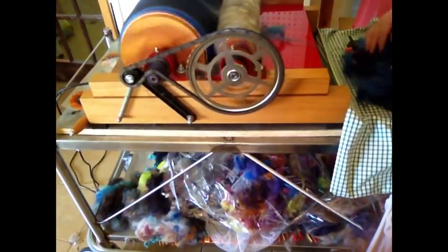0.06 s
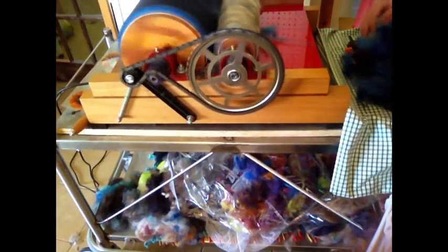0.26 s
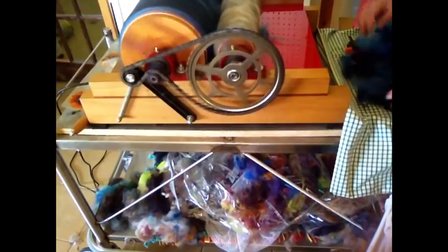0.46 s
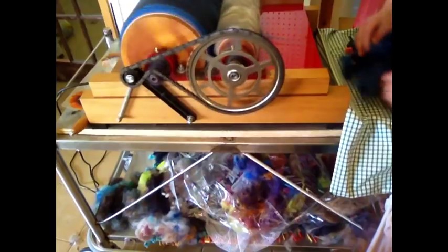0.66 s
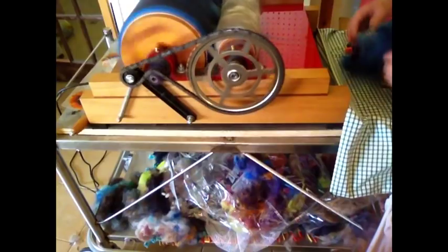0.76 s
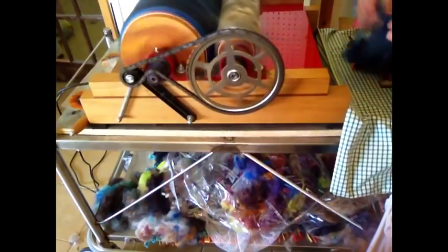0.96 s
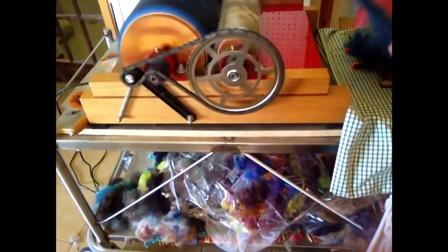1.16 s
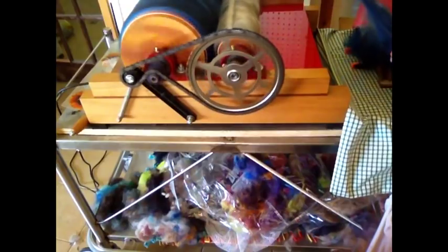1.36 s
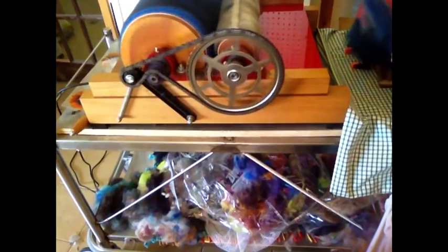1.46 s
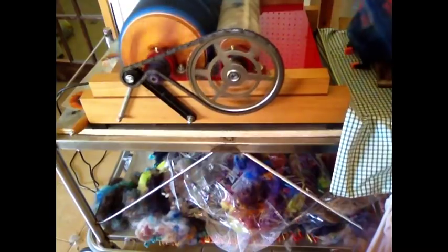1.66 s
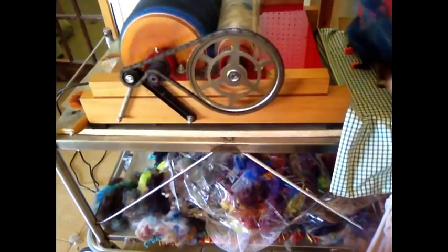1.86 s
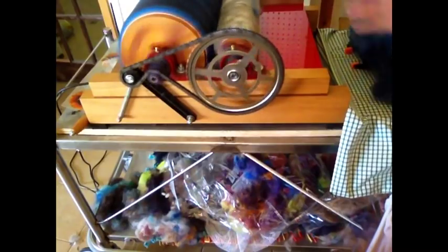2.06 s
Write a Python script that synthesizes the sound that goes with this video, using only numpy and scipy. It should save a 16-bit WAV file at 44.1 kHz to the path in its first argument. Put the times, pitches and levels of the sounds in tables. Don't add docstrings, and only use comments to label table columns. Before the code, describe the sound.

An electric drum carder hums and buzzes close by in a small room, wire teeth rasping wool; the rasp swells into a rattling wooden thump at half a second, then eases, with small knocks and chain ticks.

```python
import sys
import numpy as np
from scipy import signal
from scipy.fft import rfft, irfft
from scipy.io import wavfile

SR = 44100
rng = np.random.default_rng(int(sys.argv[2]) if len(sys.argv) > 2 else 0)


def wrap_up_sound(samples):
    columns = np.atleast_2d(samples).T
    tamed = np.clip(columns, -1, 1)
    steps = np.round(tamed * 32767).astype(np.int16)
    wavfile.write(sys.argv[1], SR, steps)


def linear_from_db(decibels):
    return 10 ** (np.asarray(decibels, float) / 20)


N = 92610


def evened(x):
    return x / np.sqrt(np.mean(x ** 2) + 1e-20)


def slow(rate_hz):
    b, a = signal.butter(2, rate_hz, fs=SR)
    return evened(signal.lfilter(b, a, rng.standard_normal(N + SR))[SR:])


def hit_time():
    return np.arange(SR // 4) / SR


def shaped(x, points):
    hz = np.fft.rfftfreq(len(x), 1 / SR) + 1
    f, db = np.transpose(points)
    octaves_out = np.maximum(np.log2(f[0] / hz), 0) + np.maximum(np.log2(hz / f[-1]), 0)
    colour_db = np.interp(np.log(hz), np.log(f), db) - 18 * octaves_out
    return evened(irfft(rfft(x) * linear_from_db(colour_db), len(x)))


def resonate(x, hz, width):
    turn = np.exp(2j * np.pi * np.cumsum(hz * np.ones(len(x))) / SR)
    r = np.exp(-np.pi * width / SR)
    return 2 * (turn * signal.lfilter([1 - r], [1, -r], x / turn)).real


def ring(modes, spread):
    t = hit_time()
    x = np.zeros(len(t))
    for hz, db, t60 in modes:
        detune, change = rng.uniform(-0.86, 1, 2)
        x += linear_from_db(db + 2 * change - 60 * t / t60) * np.sin(2 * np.pi * hz * (1 + spread * detune) * t)
    return x / abs(x).max()


def add(mix, s, sound):
    part = mix[max(round(s * SR), 0):][:len(sound)]
    part += sound[:len(part)]


def highpass(x, order, hz):
    return signal.sosfilt(signal.butter(order, hz, "high", fs=SR, output="sos"), x)


def buzz(hz, width):
    path_hz = hz + 0.15 * width * slow(3.1)
    tone = np.sqrt(2) * np.sin(2 * np.pi * (np.cumsum(path_hz) / SR + rng.random()))
    fuzz = evened(resonate(resonate(rng.standard_normal(N), hz, width), hz, width))
    share = 0.65 * (width < 20)
    return share * tone + (1 - share) * fuzz


# multiple of 120 Hz, level in dB rms.
HUM_TONES = [(1, -73.5), (2, -50.5), (3, -90), (4, -68.5), (5, -52), (6, -85.5)]
# pitch in Hz, width in Hz, level in dB.
BUZZ_LINES = [(139.7, 1.5, -68), (172.2, 8.6, -64.5), (202, 21, -62.5), (269.4, 9.7, -55),
              (311.6, 8.2, -56.5), (352.8, 10.4, -51), (389, 14.2, -53.5), (420, 56, -64), (621, 49, -59)]
# frequency in Hz, level in dB per Hz.
FLOOR_COLOUR = [(60, -33.5), (105, -27), (140, -11.5), (240, -1.5), (700, -13.5), (1900, -18.5),
                (3500, -27.5), (15000, -33)]


def motor(load_db):
    t = np.arange(N) / SR
    strain = 1 / (1 + np.exp((t - 1.117) / 0.016))
    hum = np.zeros(N)
    for k, db in HUM_TONES:
        strain_db = (-8 + 5 * slow(8.4)) * (k > 2) * strain
        level = np.sqrt(2) * linear_from_db(db + 0.7 * slow(3.1) + strain_db)
        hum += level * np.sin(2 * np.pi * (k * 120 * t + rng.random()))
    frame = sum(linear_from_db(db) * buzz(hz, width) for hz, width, db in BUZZ_LINES)
    floor = linear_from_db(-51.5 + 1.1 * slow(2.3)) * shaped(rng.standard_normal(N), FLOOR_COLOUR)
    return hum + frame * linear_from_db(0.084 * load_db - 4 * strain) + floor


def gritty(per_s, spread_db, share):
    size = linear_from_db(spread_db * np.minimum(rng.exponential(1, N), 5))
    contacts = size * (rng.random(N) < per_s / SR) * rng.choice([-1, 1], N)
    return share * evened(contacts) + (1 - share) * rng.standard_normal(N)


# frequency in Hz, level in dB per Hz.
RASP_COLOUR = [(200, -11), (400, 2.5), (800, -8.5), (1150, -6), (1800, -4), (2400, -10), (3000, -18),
               (5000, -22.5)]
# frequency in Hz, level in dB per Hz.
HISS_COLOUR = [(2500, -2), (4500, -5.5), (8000, -7), (11500, -9), (14000, -17.5), (15300, -24)]
# pitch in Hz, width in Hz, level in dB.
DRUM_MODES = [(880, 10, -42), (958, 17, -0.5), (1042.5, 14, -3.5), (1198, 80, 0.5), (1385, 18, -4),
              (1560, 40, -2), (1805, 46, -3), (2275, 66, -6.5), (2720, 44, -18)]


def carding(level_db, hiss_db, centre_hz):
    teeth = shaped(gritty(2500, 2.43, 0.43), RASP_COLOUR)
    wander = evened(resonate(teeth, centre_hz, 220))
    drum = evened(sum(linear_from_db(db) * resonate(teeth, hz, w) / np.sqrt(w) for hz, w, db in DRUM_MODES))
    rasp = evened(teeth + linear_from_db(-12.5) * wander + linear_from_db(-3) * drum)
    hiss = shaped(gritty(2800, 2.6, 0.38), HISS_COLOUR)
    rasp_level = linear_from_db(level_db + 0.9 * slow(31))
    hiss_level = linear_from_db(level_db + hiss_db + 0.5 + 1.4 * slow(26))
    return rasp_level * rasp + hiss_level * hiss


# start in seconds, peak level in dB.
PIN_SNAPS = [(0.0572, -38), (0.111, -43), (0.5486, -36.5), (0.5784, -29.5), (0.598, -39), (0.9631, -38),
             (1.3859, -34.5), (1.4083, -49), (1.7803, -60), (1.8555, -48.5), (1.9884, -55)]
# pitch in Hz, width in Hz, level in dB.
PIN_BANDS = [(12500, 1100, -6), (11200, 3500, -10), (8400, 2600, -11.5), (6700, 1400, -12),
             (4250, 1800, -11)]
# pitch in Hz, level in dB, 60 dB decay in seconds.
PIN_RING = [(12270, 5, 0.044), (11200, -9, 0.022), (8600, -16, .008)]


def snaps():
    out, t = np.zeros(N), hit_time()
    for s, db in PIN_SNAPS:
        crack_and_fizz = linear_from_db(-60 * t / 0.03) + linear_from_db(8 - 60 * t / 0.17)
        z = rng.standard_normal(len(t)) * crack_and_fizz
        steel = np.zeros(len(t))
        for k, (hz, width, band_db) in enumerate(PIN_BANDS):
            band = resonate(resonate(z, hz, width), hz, width) / np.sqrt(width)
            steel += (-1) ** k * linear_from_db(band_db) * band
        add(out, s, linear_from_db(db) * (steel / abs(steel).max() + linear_from_db(-5) * ring(PIN_RING, 0.0076)))
    return out


# start in seconds, level in dB, pitch in Hz, length in seconds.
WOOL_SCUFFS = [(0.059, -46.5, 1280, 0.017), (0.393, -42, 900, 0.019), (.4, -44.5, 1500, 0.018),
               (0.421, -39, 1210, 0.033), (0.456, -37.5, 1240, 0.025), (0.453, -40, 1530, 0.01),
               (0.477, -41, 1050, 0.025), (0.5, -37, 1230, 0.013), (0.525, -37.5, 1420, 0.011),
               (0.751, -46, 1420, 0.022), (0.766, -40.5, 1540, 0.011), (0.779, -37.5, 1550, 0.023),
               (0.849, -46, 1600, 0.022), (0.958, -43, 1520, 0.04), (0.993, -45.5, 1500, 0.04),
               (1.042, -47.5, 1440, 0.027), (1.39, -47, 1820, 0.013), (1.63, -47, 1340, 0.01),
               (1.7, -44.5, 1520, 0.014), (1.855, -44, 1220, 0.012)]


def scuffs():
    out, t = np.zeros(N), hit_time()
    for s, db, hz, length in WOOL_SCUFFS:
        z = rng.standard_normal(len(t))
        drag = evened(resonate(z, hz, 140)) + linear_from_db(-5) * shaped(z, RASP_COLOUR[2:])
        swell = np.minimum(t / length * 3, 1) * np.exp(-(t / length) ** 2)
        add(out, s, linear_from_db(db + 0.5) * drag * swell)
    return out


def knock(hz):
    head_s = 0.00065
    u = hit_time() - 2 * head_s
    head = -np.cos(2 * np.pi * hz * 0.95 * u + 0.6) * np.exp(-(u / head_s) ** 2)
    board = ring([(hz, 0, 0.05), (hz * 5 / 8, -3, 0.02), (hz * 3 / 8, -6, 0.04)], 0.01)
    return head + linear_from_db(-5) * np.clip(u / 0.0006, 0, 1) * board


# start in seconds, peak level in dB, pitch in Hz.
BOARD_KNOCKS = [(.118, -31, 960), (.309, -36, 926), (.694, -35, 961), (1.105, -37, 1180), (1.157, -39, 969),
                (1.2337, -28, 966), (1.2835, -33, 1300), (1.2875, -30, 1500), (1.2935, -35, 1750),
                (1.489, -36, 1200), (1.526, -36, 915), (1.632, -40, 1150), (1.683, -37, 1080),
                (1.76, -28, 964), (1.7645, -39, 1550), (1.778, -37, 1250), (1.789, -37, 1200),
                (1.837, -38, 1370), (1.909, -38, 1260), (1.9973, -31, 1080), (2.0045, -36, 1200),
                (2.048, -39, 1790)]


def knocks():
    out = np.zeros(N)
    for s, db, hz in BOARD_KNOCKS:
        add(out, s, linear_from_db(db) * knock(hz))
    return out


# start in seconds, level in dB.
FRAME_BLOWS = [
    (0.548, -29),
    (0.554, -28),
    (0.5575, -23.5),
    (.58, -30),
    (0.604, -28.5),
    (.612, -30.5),
]
# pitch in Hz, level in dB, 60 dB decay in seconds.
BOARD_MODES = [(606.5, -3, 0.13), (900, 2, 0.055), (1153, -8, 0.084), (1790, 0, 0.027), (2840, -6, 0.03),
               (4230, -14, .02), (6340, -7.5, 0.019)]


def blows():
    out, t = np.zeros(N), hit_time()
    for s, db in FRAME_BLOWS:
        puff = linear_from_db(-8 - 60 * t / 0.072) * shaped(rng.standard_normal(len(t)), RASP_COLOUR)
        add(out, s, linear_from_db(db) * (ring(BOARD_MODES, 0.028) * np.minimum(t / 0.0002, 1) + puff))
    return out


# start in seconds, level in dB, start pitch in Hz, sag in Hz,
# 60 dB decay in seconds.
FRAME_BOOMS = [
    (0.5495, -18, 376, 10, 0.04),
    (.567, -25.5, 375, 130, .17),
    (.596, -31, 356, 8, .22),
    (.651, -35, 385, 10, .12),
]
# pitch in Hz, level in dB, 60 dB decay in seconds.
FRAME_MODES = [(142, 1, 0.79), (216, 3, 0.85), (256.3, 2, 0.73), (330, -8, 0.36), (350, -6, 0.5),
               (379, -3, 0.32)]


def thump():
    out, t = np.zeros(N), hit_time()
    rise_s, sag_s = 0.008, 0.027
    rise = np.minimum(t / rise_s, 1)
    for s, db, top_hz, sag_hz, t60 in FRAME_BOOMS:
        hz = top_hz - sag_hz * (1 - np.exp(-(t / sag_s) ** 2))
        decay = linear_from_db(-60 * np.maximum(t - rise_s, 0) / t60)
        boom = np.sin(2 * np.pi * np.cumsum(hz) / SR) * decay
        add(out, s, linear_from_db(db) * rise * (boom + linear_from_db(-16.5) * ring(FRAME_MODES, 0.0036)))
    return out


# start in
# seconds, peak level in dB.
LINK_TICKS = [(.611, -36.5), (1.058, -67), (1.106, -43), (1.1575, -43.5), (1.2094, -43), (1.2616, -47),
              (1.315, -46), (1.4363, -54), (1.4727, -65), (1.526, -57), (1.577, -51), (1.6303, -66),
              (1.6821, -47), (1.736, -44), (1.8029, -45), (1.8406, -52), (1.8936, -49), (1.9426, -49),
              (2.0468, -51)]
# pitch in Hz, level in dB, 60 dB decay in seconds.
LINK_MODES = [(3534, 18, 0.039), (3860, 10, 0.017), (2840, -3, 0.01), (2300, 2, .012), (1500, 3, 0.011),
              (4600, 0, .008)]


def chain():
    out, t = np.zeros(N), hit_time()
    grit_colour = [(900, -2), (2400, 0), (4200, -15), (8000, -29)]  # Hz, dB per Hz
    for s, db in LINK_TICKS:
        grit = linear_from_db(-4.5 - 60 * t / 0.11) * shaped(rng.standard_normal(len(t)), grit_colour)
        add(out, s - 0.0007, linear_from_db(db + 1.5) * (ring(LINK_MODES, 0.043) + grit))
        add(out, s + 0.02, linear_from_db(db - 8) * ring(LINK_MODES, 0.054))
    return out


def room(x, t60):
    t = np.arange(SR // 3) / SR
    sparse = rng.choice([-1., 1.], len(t)) * (rng.random(len(t)) < 2000 / SR)
    taps = sparse * linear_from_db(-60 * t / t60) * (t > 0.004)
    dull = signal.lfilter([0.4], [1, -0.6], taps / np.linalg.norm(taps))
    return signal.fftconvolve(x, dull)[:N]


# time in seconds, rasp level in dB, hiss relative to it in dB, rasp centre in Hz.
EFFORT = [(0.0, -44.5, -17.5, 1410), (0.2, -41, -11.5, 1240), (0.36, -50, -14.5, 1300),
          (0.47, -36, -14, 1420), (0.54, -39.5, -11, 1370), (0.549, -36, -13, 1540),
          (0.68, -45, -11.5, 1320), (0.74, -48.5, -11.5, 1500), (0.78, -42, -10, 1520),
          (0.83, -42, -12.5, 1430), (1.05, -45.5, -15.5, 1510), (1.2, -51.5, -6.5, 1380),
          (1.28, -46, -19, 1430), (1.43, -46.5, -16.5, 1430), (1.6, -47.5, -12.5, 1500),
          (1.72, -48.5, -15.5, 1380), (1.79, -47.5, -12, 1310), (2.1, -56, -20, 1200)]


def scene():
    t = np.arange(N) / SR
    s, *columns = np.transpose(EFFORT)
    level_db, hiss_db, centre_hz = (np.interp(t, s, c) for c in columns)
    machine = motor(level_db + 63) + carding(level_db, hiss_db, centre_hz)
    hits = highpass(snaps() + blows() + chain(), 4, 110)
    taps = highpass(scuffs() + knocks(), 2, 200)
    tail = room(linear_from_db(-4.5) * hits + linear_from_db(-9.5) * taps, 0.32)
    return (machine + hits + taps + thump() + tail)[None]


def low_pass(x):
    return signal.sosfilt(signal.butter(12, 16040, fs=SR, output="sos"), x)


def record(dry):
    edge = signal.firwin(401, 15450, window=("kaiser", 8), fs=SR)
    mix = signal.oaconvolve(dry, edge[None], "same")
    return low_pass(mix)


dry = scene()
out = record(dry)
wrap_up_sound(out)
```